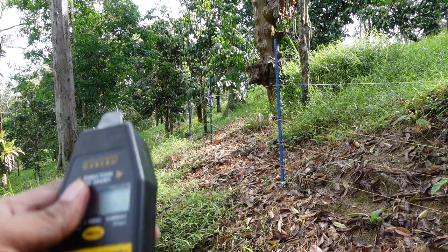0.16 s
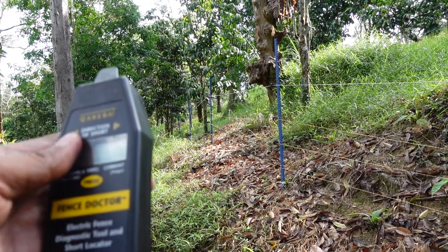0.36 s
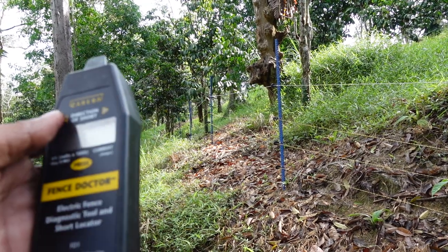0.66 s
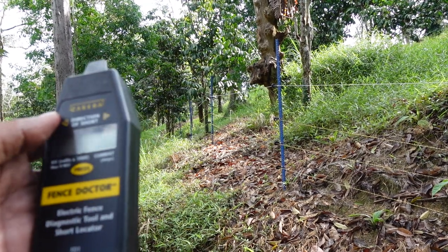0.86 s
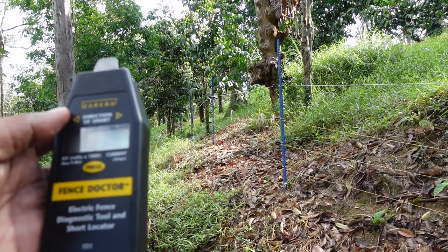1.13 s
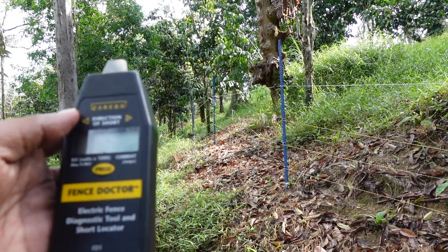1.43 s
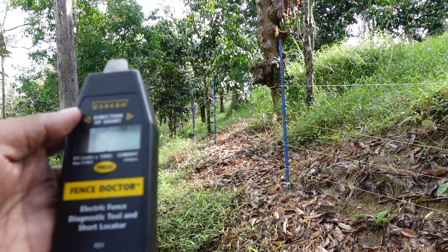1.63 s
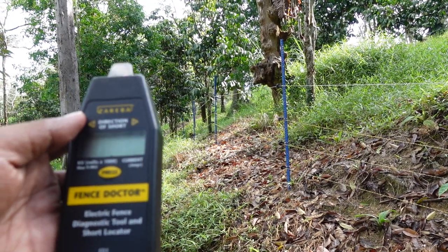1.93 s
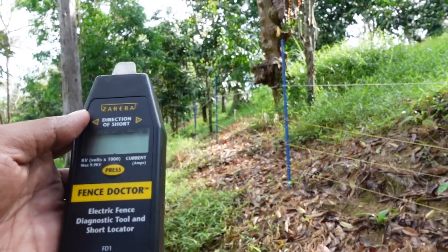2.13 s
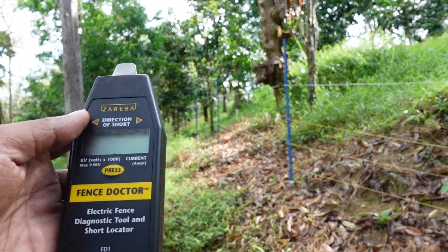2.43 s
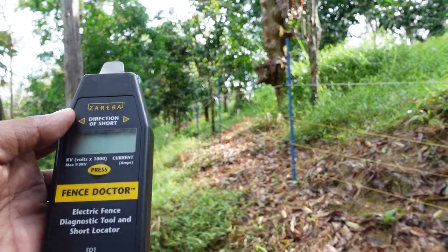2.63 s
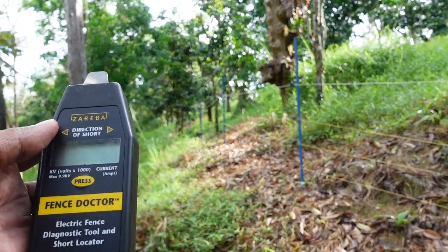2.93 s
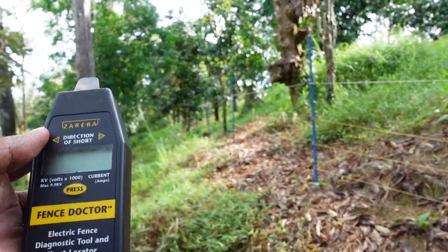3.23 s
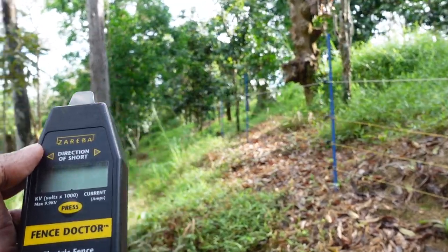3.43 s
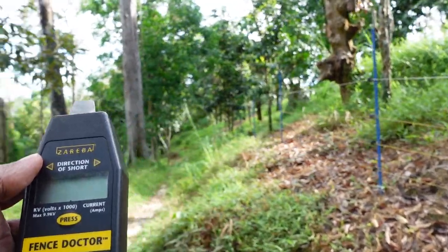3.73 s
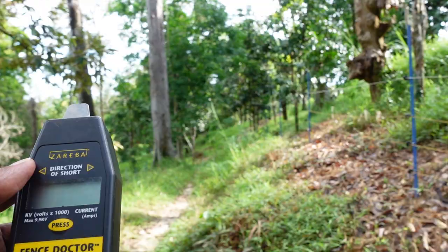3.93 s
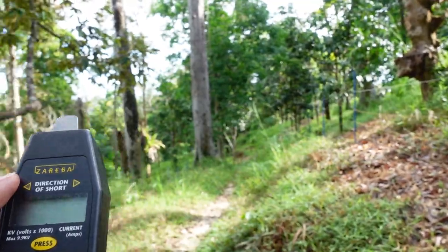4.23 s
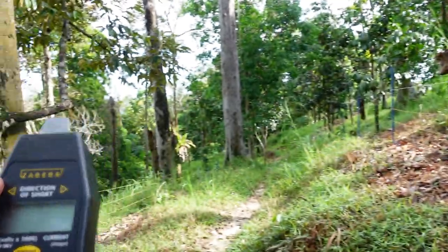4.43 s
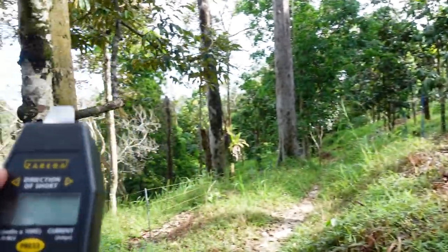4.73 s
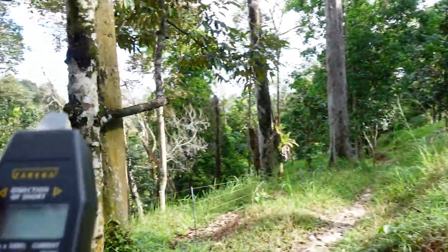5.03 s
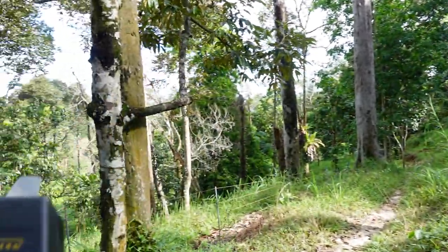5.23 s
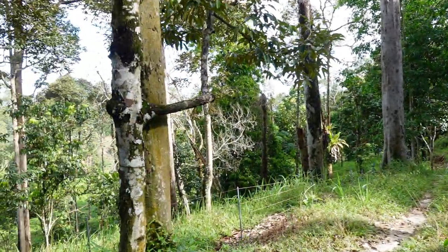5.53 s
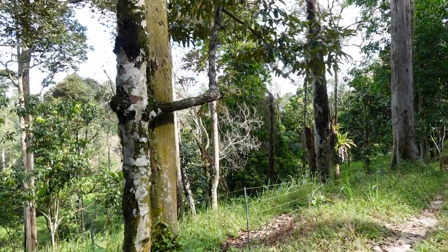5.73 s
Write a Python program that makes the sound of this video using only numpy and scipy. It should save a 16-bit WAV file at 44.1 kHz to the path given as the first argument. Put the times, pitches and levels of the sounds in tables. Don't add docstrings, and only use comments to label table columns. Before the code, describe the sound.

Steady shrill insects and echoing bird notes outdoors, a hard click midway, then a faint distant engine and crackling leaf steps.

```python
import sys
import numpy as np
from scipy import signal
from scipy.io import wavfile
from scipy.ndimage import uniform_filter1d

SR = 44100
rng = np.random.default_rng(int(sys.argv[2]) if len(sys.argv) > 2 else 0)


def generate_wav(signal):
    frames = np.transpose(np.atleast_2d(signal))
    scaled = np.clip(frames, -1, 1) * 32767
    pcm = np.round(scaled).astype(np.int16)
    wavfile.write(sys.argv[1], SR, pcm)


def attenuation_scalar(level_db):
    decades = np.asarray(level_db, float) / 20
    return 10 ** decades


N = 258867


def evened(x):
    return x / np.sqrt(np.mean(x ** 2) + 1e-20)


def drift(count, size):
    return evened(uniform_filter1d(rng.standard_normal(count), size=size))


def read(points, hz):
    f, value = np.transpose(points)
    return np.interp(np.log(hz + 1), np.log(f + 1), value)


def follow(rows):
    s, *columns = np.transpose(rows)
    return [np.interp(np.arange(N) / SR, s, column) for column in columns]


def add(mix, s, sound):
    part = mix[..., round(s * SR):][..., :sound.shape[-1]]
    part += sound[..., :part.shape[-1]]


def placed(x, pan_db):
    return np.array([x * attenuation_scalar(pan_db / 2), x / attenuation_scalar(pan_db / 2)])


def resonate(x, hz, width_hz):
    turn = np.exp(2j * np.pi * hz * np.arange(len(x)) / SR)
    r = np.exp(-np.pi * width_hz / SR)
    return 2 * (turn * signal.lfilter([1 - r], [1, -r], x / turn)).real


def hiss(colour, patchy_db, flicker_db, tilt_db_per_octave=0., size=512):
    # frequency in Hz, left-right likeness from -1 to 1.
    likeness = [(60, 1), (130, 0.44), (290, 0.25), (640, -0.097), (1410, -0.13), (3100, -0.16),
                (6820, 0.68), (10500, 0.051), (15000, 0.28)]
    # frequency in Hz, left-right level in dB.
    lean_db = [(60, 2), (180, -0.5), (550, 0.5), (1650, 3), (4970, -0.5), (15000, -0.5)]
    hop, bins = size // 4, size // 2 + 1
    frames, hz = N // hop + 5, np.fft.rfftfreq(size, 1 / SR)
    a, b, c, d, patches = rng.standard_normal((frames, bins, 5)).T
    patches = uniform_filter1d(patches, size=size // 100, axis=0)
    patches = evened(uniform_filter1d(patches, size=10000 // size, axis=1))
    flicker = drift(frames, 1 + 3000 // size)
    same = np.clip(read(likeness, hz), -1, 1)[:, None]
    left = a + 1j * b
    z = np.array([left, same * left + np.sqrt(1 - same ** 2) * (c + 1j * d)])
    z *= attenuation_scalar(read(colour, hz)[:, None] + patchy_db * patches + flicker_db * flicker)
    z *= placed(np.ones(bins), read(lean_db, hz))[:, :, None]
    scale = np.sqrt(np.mean(abs(z) ** 2))
    tilt = (tilt_db_per_octave * np.ones(N))[np.minimum(np.arange(frames) * hop, N - 1)]
    z *= attenuation_scalar(np.outer(np.log2(np.maximum(hz, 400) / 1500), tilt))
    noise = signal.istft(z / scale, nperseg=size, noverlap=size - hop)[1][:, :N]
    return noise / np.sqrt(size / 2.675)


def grove(x, early_db=4.0):
    # frequency in Hz, t60 of the ring among the trunks in s.
    ring_t60 = [(1000, 0.72), (3000, 1), (5500, 1), (9000, 0.76)]
    early_s, same = 0.0071, 0.67
    taps = np.zeros((2, SR))
    at = np.arange(40, SR - 20, 20) + rng.integers(0, 20, (2, (SR - 41) // 20))
    np.put_along_axis(taps, at, rng.choice([-1., 1.], at.shape), 1)
    taps[1] = same * taps[0] + np.sqrt(1 - same ** 2) * taps[1]
    taps *= 1 + attenuation_scalar(early_db) * np.exp(-np.arange(SR) / SR / early_s)
    hz, t, z = signal.stft(taps, SR, nperseg=256)
    tail = signal.istft(z * attenuation_scalar(-60 * t / read(ring_t60, hz)[:, None]), SR, nperseg=256)[1]
    return signal.fftconvolve(x[None], tail / np.linalg.norm(tail[0]), axes=1)[:, :N]


def air():
    # frequency in Hz, density in dB per Hz.
    air_colour = [(18, -72), (30, -26.5), (103, -13), (296, -6.5), (501, -1), (639, -6.5), (767, -9.5),
                  (2640, -15.5), (3040, -10.5), (3500, -19.5), (3800, -35), (4940, -54), (8360, -120)]
    return attenuation_scalar(-47) * hiss(air_colour, patchy_db=1.5, flicker_db=-0.16, size=2048)


def chorus():
    # time in s, level in dB, left-right level in dB.
    chorus_course = [
        (0, -38.5, -4),
        (1.0, -38.5, -5.5),
        (3.0, -38, -5),
        (4.9, -38, -4.5),
        (5.4, -37, -5),
        (5.87, -38, -5),
    ]
    # frequency in Hz, density in dB per Hz.
    chorus_colour = [(2240, -86), (3800, -20), (4140, -24), (4710, -5.5), (5280, -21.5), (6430, 1),
                     (7310, 0), (7770, -6.5), (8770, -37), (10600, -15), (11900, -37.5), (13700, -22.5),
                     (15200, -35.5), (15900, -19), (16400, -56)]
    level_db, pan_db = follow(chorus_course)
    singers = hiss(chorus_colour, patchy_db=1.27, flicker_db=0.22)
    return attenuation_scalar(level_db + 4.5) * singers * placed(0.94, pan_db - pan_db.mean())


def engine():
    # time in s, level in dB, firings per s.
    engine_course = [
        (3.68, -66, 25.2),
        (3.92, -61, 30),
        (4.31, -65.5, 28.7),
        (4.52, -55.5, 22.3),
        (4.94, -52.5, 27),
        (5.29, -57.5, 29),
        (5.45, -56, 25.7),
        (5.87, -56, 26.5),
    ]
    # resonance in Hz, width in Hz, level in dB.
    exhaust = [(135.4, 63, 0), (250, 61, 2), (500, 226, -9)]
    level_db, rate_hz = follow(engine_course)
    waver = 1 + .015 * drift(N, 3000)
    firings = np.diff(np.floor(np.cumsum(rate_hz * waver) / SR), prepend=0)
    firings = firings * attenuation_scalar(0.62 * rng.standard_normal(N))
    smear = rng.standard_normal(4000) * np.exp(-np.arange(4000) / SR / .022)
    firings = signal.oaconvolve(firings, smear)[:N]
    pipe = np.zeros(N)
    for hz, width_hz, db in exhaust:
        gust_db = 2.8 * drift(N, 9000)
        pipe += attenuation_scalar(db + gust_db) * resonate(resonate(firings, hz, width_hz), hz, width_hz)
    fade_in = np.clip((np.arange(N) / SR - engine_course[0][0]) / 0.17, 0, 1)
    return attenuation_scalar(level_db + 2.0) * fade_in * evened(pipe)


def katydid():
    # centre in s, length in s, level in dB.
    katydid_bursts = [
        (0.037, 0.15, -47.5),
        (1.117, 0.32, -51),
        (2.328, 0.32, -50),
        (3.44, 0.29, -47),
        (4.538, 0.31, -50),
        (5.742, 0.33, -49),
    ]
    t = np.arange(N) / SR
    scrapes = np.maximum(np.cos(2 * np.pi * 72.5 * t), 0) ** 1.5
    scrapes *= 1 + .4 * np.cos(2 * np.pi * 24.2 * t)
    rasp = scrapes * (.8 + rng.standard_normal(N))
    wing = resonate(resonate(rasp, 4940, 340), 4940, 340)
    swell = sum(attenuation_scalar(db) * np.exp(-(2 * (t - s) / length) ** 4) for s, length, db in katydid_bursts)
    out = swell * evened(wing)
    return placed(out, .3) + attenuation_scalar(2.0) * grove(out)


def cricket():
    # first chirp in s, silent from in s, level in dB.
    bouts = [
        (0.029, 1.2, -39.5),
        (1.378, 1.5, -40.5),
        (1.245, 2.2, -47.5),
        (1.819, 2.15, -41.5),
        (2.295, 2.4, -42.5),
        (2.52, 3.7, -40),
        (3.827, 5.0, -41.5),
        (5.124, 5.45, -47),
    ]
    chirp_every_s, pair_gap_s, stroke_spread_db = .2162, .049, 1.5
    out, t = np.zeros(N), np.arange(round(.03 * SR)) / SR
    for first, end, db in bouts:
        for chirp_s in np.arange(first, end, chirp_every_s):
            for gap_s in (0, pair_gap_s):
                detune, force = rng.standard_normal(2)
                turns = (7610 + 15 * detune) * t - 3000 * t ** 2
                stroke = np.sin(2 * np.pi * turns) * signal.windows.tukey(len(t), .5)
                level = attenuation_scalar(db + 3.5 + stroke_spread_db * force)
                add(out, chirp_s + gap_s - t[-1] / 2, level * stroke)
    return placed(out, -3.5) + attenuation_scalar(-12) * grove(out)


def leaves():
    # centre in s, length in s, level in dB, brightness in dB per octave.
    leaf_steps = [
        (0, 0.46, -44, -2.5),
        (4.317, 0.07, -45.5, 4),
        (4.559, 0.063, -41, 2.5),
        (4.653, 0.085, -42.5, 1),
        (4.71, .05, -54.5, 7),
        (5.0, 2.5, -53.5, 5),
        (5.312, 0.26, -40, 3),
        (5.52, 0.083, -44, 1),
        (5.67, 0.16, -40, 1),
        (5.86, 0.15, -43, 0.5),
    ]
    # frequency in Hz, density in dB per Hz.
    leaf_colour = [(150, -34), (500, 0.5), (900, -6), (2000, -8.5), (4500, -11.5), (9000, -18),
                   (12000, -23), (14500, -27.5), (16000, -29)]
    s, length, db, tilt = np.transpose(leaf_steps)[:, :, None]
    power = attenuation_scalar(2 * db) * (np.exp(-abs(2 * (np.arange(N) / SR - s) / length) ** 3.5) + 1e-9)
    brightness = (power * tilt).sum(0) / power.sum(0)
    cracks = attenuation_scalar(1.3 * np.minimum(rng.exponential(1, N), 5)) * (rng.random(N) < 1200 / SR)
    crackle = 6.0 + evened(signal.oaconvolve(cracks, np.exp(-np.arange(400) / 60.))[:N])
    rustle = hiss(leaf_colour, patchy_db=2.1, flicker_db=1.5, tilt_db_per_octave=brightness)
    return np.sqrt(power.sum(0)) * evened(crackle) * rustle


def handling():
    # time in s, peak in dB, ring in Hz, t60 in s, left-right level in dB.
    knocks = [
        (.0001, -12, 336, 0.038, 1),
        (.0001, -33, 62, 0.029, -1),
        (3.398, -28.5, 500, 0.015, 0),
        (5.62, -40.5, 193, 0.11, 1),
    ]
    shell_taps = [
        (.2712, -26, 1150, 0.0048, 0),
        (.3951, -36.5, 1060, 0.017, 1),
        (.5328, -45, 1070, 0.087, 5),
        (.616, -35.5, 1090, 0.038, 3),
        (.7292, -36, 1050, 0.048, 2),
        (2.1317, -42, 10100, .004, 0),
        (2.5615, -41, 1910, 0.013, 15),
        (3.3948, -10, 11160, 0.0052, 4),
        (3.3946, -20, 14300, 0.0065, 8),
        (3.3966, -33.5, 1320, 0.038, 3),
    ]
    snaps = [
        (.1445, -24.5, 1300, 0.0035, 0),
        (4.5654, -33.5, 1250, 0.01, -4),
        (4.6317, -29, 312, 0.0073, -3),
        (4.7223, -37, 11000, .005, 0),
    ]
    # start in s, length in s, peak in dB, pitch in Hz.
    creaks = [
        (2.048, 0.012, -43.5, 525),
        (2.055, 0.033, -43, 482),
        (3.443, 0.041, -51, 403),
        (4.238, 0.019, -48, 520),
        (4.361, 0.0294, -44.5, 505),
        (4.387, 0.039, -42, 469),
        (5.072, 0.023, -48.5, 547),
    ]
    out, t = np.zeros((2, N)), np.arange(4000) / SR
    for rows, edge_db in ((knocks, -45), (shell_taps, -6.5), (snaps, 6.5)):
        for s, db, hz, t60_s, pan_db in rows:
            ring = np.sin(2 * np.pi * hz * t) * attenuation_scalar(-60 * t / t60_s) * np.minimum(t / 0.00007, 1)
            grit = resonate(rng.standard_normal(4000), 4000, 2000)
            edge = attenuation_scalar(edge_db) * grit * np.exp(-t / 0.00039)
            add(out, s, attenuation_scalar(db) * placed(ring + edge, pan_db))
    for s, length, db, hz in creaks:
        u = np.arange(0, 1, 1 / (length * SR))
        swell = u ** 0.88 * np.minimum((1 - u) / 0.043, 1)
        add(out, s, attenuation_scalar(db + 9.0) * placed(swell * np.sin(2 * np.pi * hz * length * u), 0.66))
    return out


def note(start, length, from_hz, to_hz, db, rise, rise_db, fall, fall_db, glide=1., arch_hz=0.):
    u = np.linspace(0, 1, 41)
    hz = from_hz + (to_hz - from_hz) * np.minimum(u / glide, 1) + arch_hz * 4 * u * (1 - u)
    level = db + rise_db * np.clip(1 - u / rise, 0, 1)
    level = level + fall_db * np.clip((u - fall) / (1 - fall), 0, 1)
    return np.transpose([start + length * u, hz, level])


def bird(notes, pan_db, dry_db, warble=.004, ground_s=.0013, ground_db=-4., echo_db=-20., early_db=4.0):
    out = np.zeros(N)
    for rows in notes:
        s, hz, db = np.transpose(rows)
        t = np.arange(s[0], s[-1], 1 / SR)
        unsteady = 1 + warble * drift(len(t), 500)
        whistle = np.sin(2 * np.pi * np.cumsum(np.interp(t, s, hz) * unsteady) / SR)
        edge = np.clip(np.minimum(t - s[0], s[-1] - t) / 0.00072, 0, 1)
        add(out, s[0], np.sqrt(2) * attenuation_scalar(np.interp(t, s, db)) * edge * whistle)
    direct, echo = out.copy(), np.zeros(N)
    add(direct, ground_s, attenuation_scalar(ground_db) * out)
    add(echo, .1, attenuation_scalar(echo_db) * out)
    ringing = grove(out, early_db) * placed(0.86, pan_db / 3)[:, None]
    return attenuation_scalar(dry_db) * placed(direct, pan_db) + placed(echo, -pan_db) + ringing


def piper():
    # start in s, length in s, from Hz, to Hz, level in dB.
    piper_notes = [
        (1.903, 0.331, 1597, 1528, -59),
    ]
    pipe = [note(*row, rise=0.52, rise_db=-6.5, fall=0.83, fall_db=-3) for row in piper_notes]
    return bird(pipe, pan_db=17, dry_db=-5.5)


def hidden_singer():
    # start in s, length in s, from Hz, to Hz, level in dB.
    hidden_falls = [
        (2.86, .03, 5540, 3200, -31),
        (2.966, 0.025, 5610, 3100, -28),
    ]
    hidden_flicks = [
        (1.098, 0.023, 3320, 3790, -30),
        (5.53, 0.039, 3350, 3750, -31),
    ]
    notes = [note(*row, rise=0.3, rise_db=-9.5, fall=0.42, fall_db=-14, arch_hz=-150)
             for row in hidden_falls]
    notes += [note(*row, rise=.1, rise_db=0, fall=0.022, fall_db=-17) for row in hidden_flicks]
    return bird(notes, pan_db=-4.0, dry_db=-26, early_db=-30)


def twitterer():
    # start in s, from Hz, level in dB.
    flicks = [
        (5.047, 7840, -38.5),
        (5.258, 7600, -37),
        (5.452, 7500, -37.5),
        (5.631, 7250, -37),
        (5.822, 7210, -32.5),
    ]
    drops = [
        (5.085, 7150, -35),
        (5.315, 6920, -36),
        (5.49, 6520, -36),
        (5.69, 6200, -38.5),
    ]
    flick_s, flick_hz, drop_s, drop_hz = .034, 560, .03, 240
    notes = [note(s, flick_s, hz, hz + flick_hz, db, rise=0.65, rise_db=-2, fall=0.76, fall_db=0)
             for s, hz, db in flicks]
    notes += [note(s, drop_s, hz, hz - drop_hz, db, rise=.3, rise_db=0, fall=0.57, fall_db=-11)
              for s, hz, db in drops]
    return bird(notes, pan_db=-15, dry_db=-8.5)


def sweeper():
    # start in s, sweep length in s, from Hz, to Hz, level in dB.
    downs = [
        (3.156, 0.039, 6410, 3160, -26.5),
        (3.435, .045, 6300, 3026, -27.5),
    ]
    ups = [
        (3.232, .053, 2650, 5340, -28.5),
        (3.515, .047, 2900, 5496, -27),
    ]
    hold_s = 0.035
    notes = [note(*row, rise=0.45, rise_db=-7, fall=0.61, fall_db=-13) for row in downs]
    notes += [note(s, up_s + hold_s, a, b, db, rise=0.24, rise_db=-19, fall=0.61, fall_db=-17,
                   glide=up_s / (up_s + hold_s)) for s, up_s, a, b, db in ups]
    return bird(notes, pan_db=-12.5, dry_db=-5.0, ground_s=.00074, ground_db=-5, echo_db=-17.5)


def fluter():
    # start in s, length in s, from Hz, to Hz, level in dB.
    level_notes = [
        (0.221, 0.15, 2394, 2336, -53.5),
        (0.333, 0.11, 2838, 2883, -39.5),
        (1.078, 0.145, 3293, 3313, -35.5),
        (1.35, 0.21, 2416, 2337, -44.5),
        (4.77, 0.035, 3490, 3570, -48),
        (5.491, .12, 3277, 3340, -42.5),
        (5.62, .18, 3320, 3308, -43),
        (5.775, 0.11, 2420, 2340, -50),
    ]
    # start in s, from Hz, arch height in Hz, to Hz, level in dB.
    arches = [
        (.497, 3084, 250, 2978, -36),
        (0.808, 2538, 430, 2300, -36),
    ]
    notes = [note(*row, rise=0.22, rise_db=-6, fall=0.28, fall_db=-22) for row in level_notes]
    notes += [note(s, .225, a, b, db, rise=0.26, rise_db=-14.5, fall=0.78, fall_db=-7.5, arch_hz=arch_hz)
              for s, a, arch_hz, b, db in arches]
    return bird(notes, pan_db=3.0, dry_db=-5.5, warble=0.009, ground_db=-40)


def scene():
    background = air() + chorus() + engine()
    insects = katydid() + cricket()
    birds = piper() + hidden_singer() + twitterer() + sweeper() + fluter()
    return background + insects + leaves() + handling() + birds


def band_limit(x):
    return signal.sosfilt(signal.butter(12, 15850, fs=SR, output="sos"), x)


def record(dry):
    cut = signal.sosfilt(signal.butter(3, 75, "high", fs=SR, output="sos"), dry)
    return band_limit(cut)


dry = scene()
out = record(dry)
generate_wav(out)
```